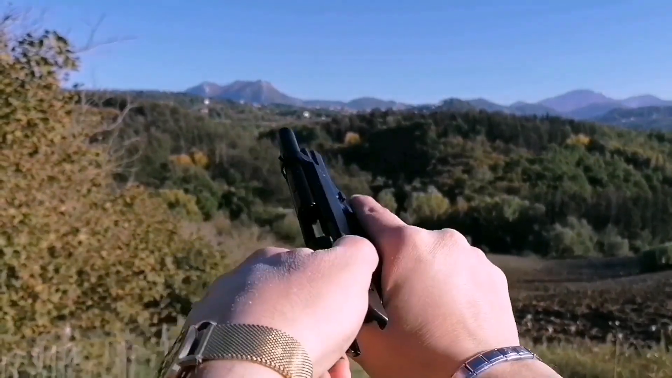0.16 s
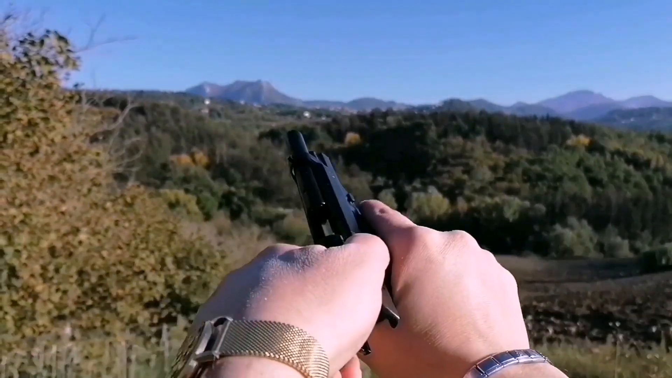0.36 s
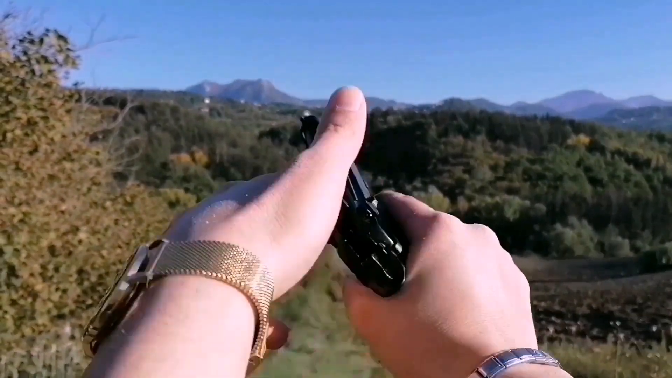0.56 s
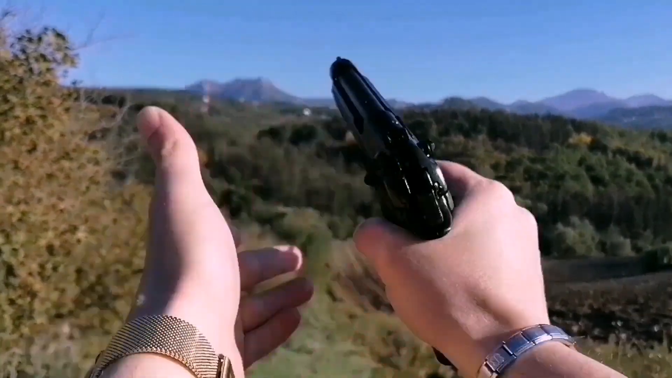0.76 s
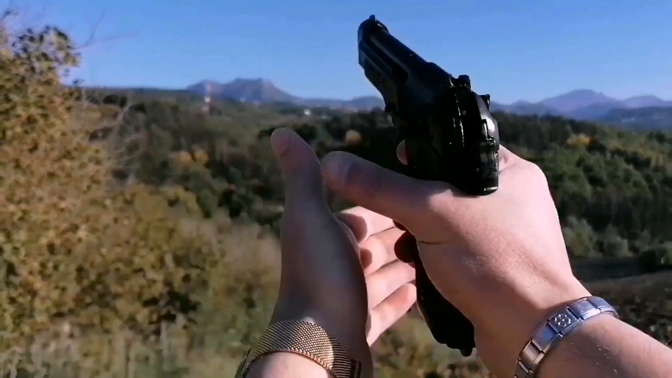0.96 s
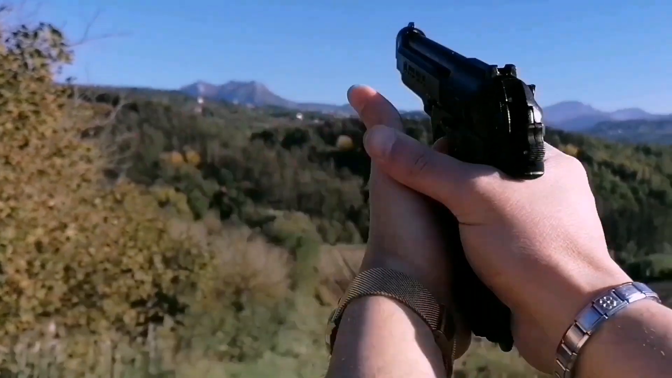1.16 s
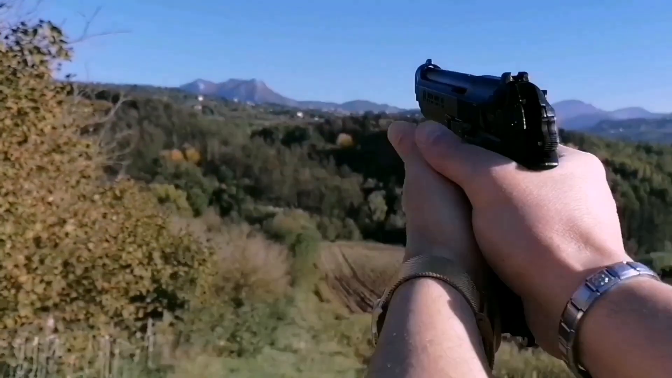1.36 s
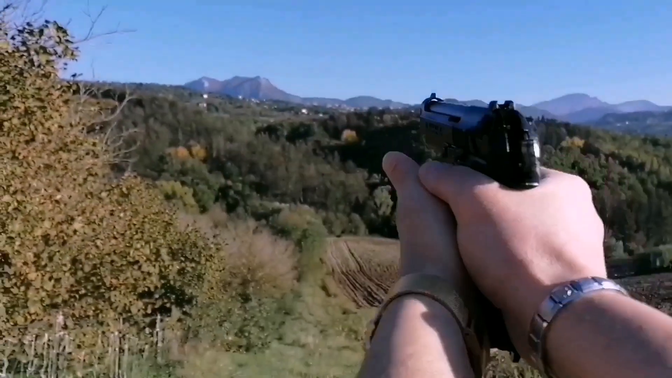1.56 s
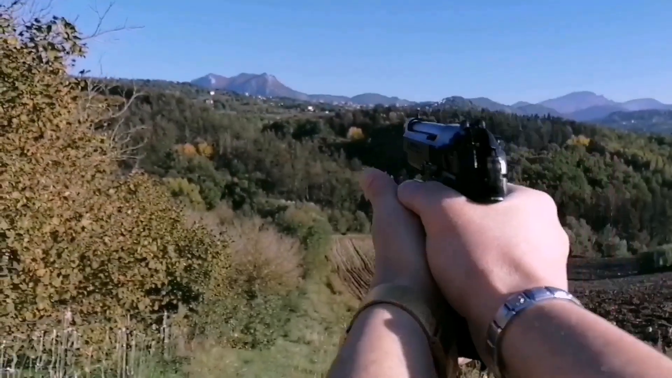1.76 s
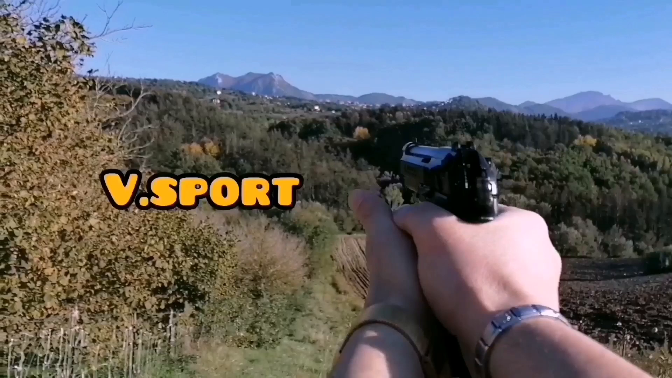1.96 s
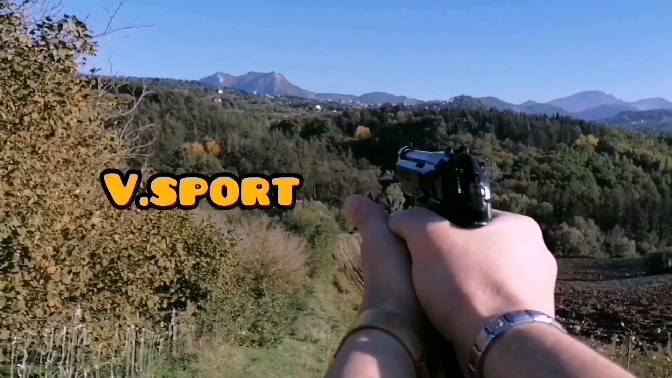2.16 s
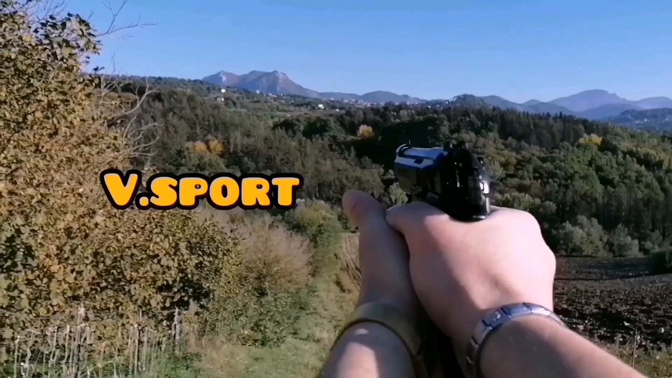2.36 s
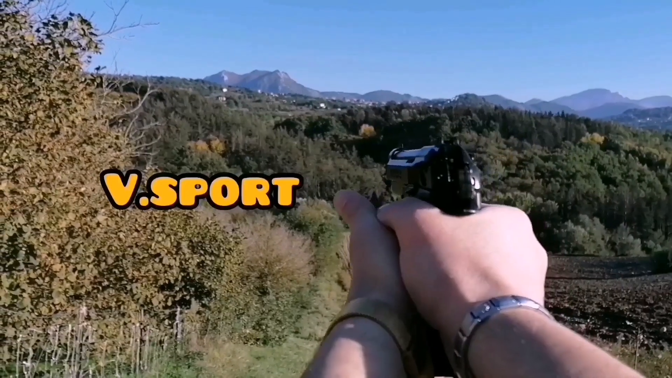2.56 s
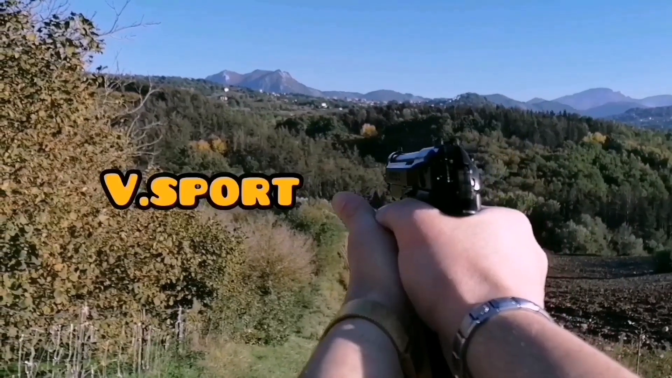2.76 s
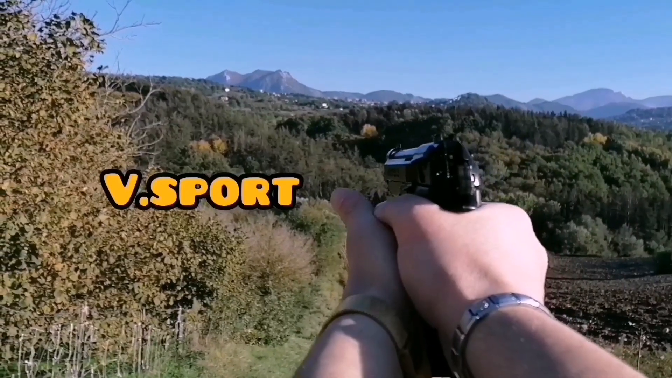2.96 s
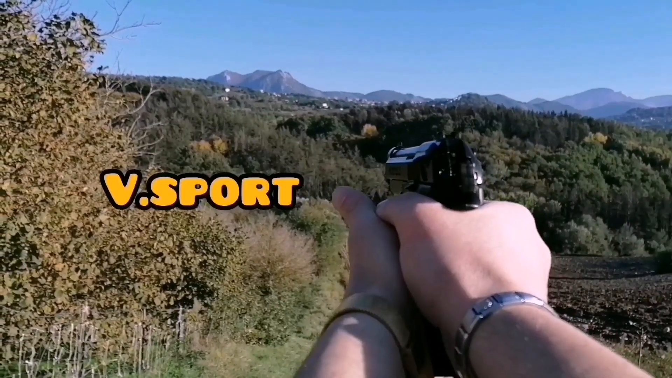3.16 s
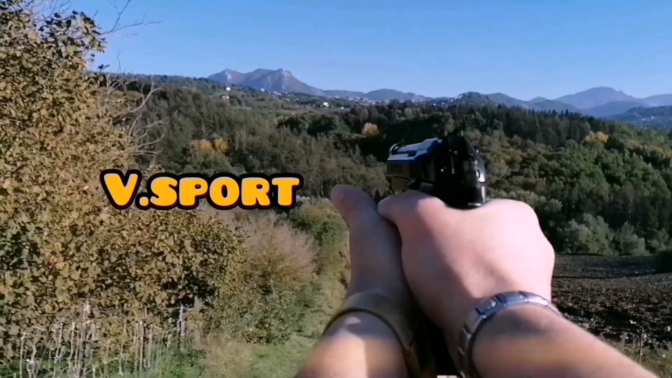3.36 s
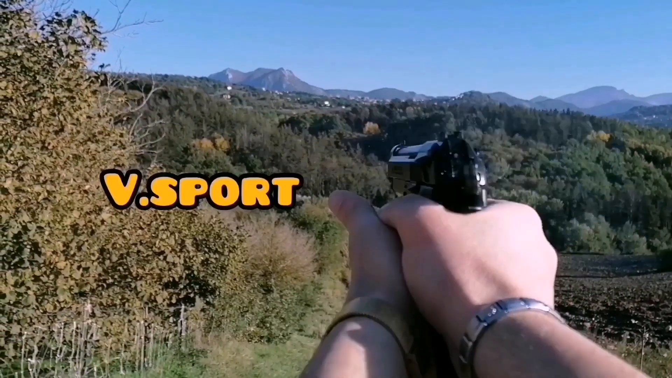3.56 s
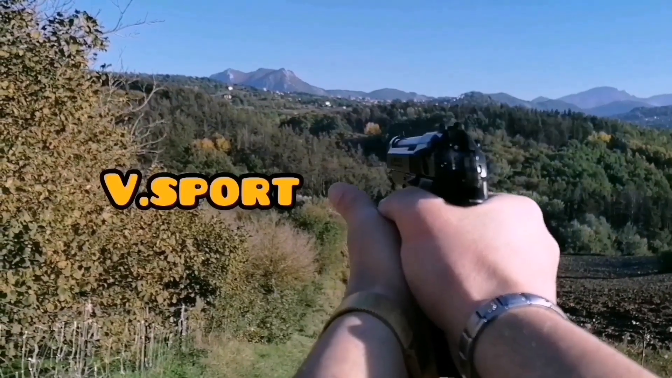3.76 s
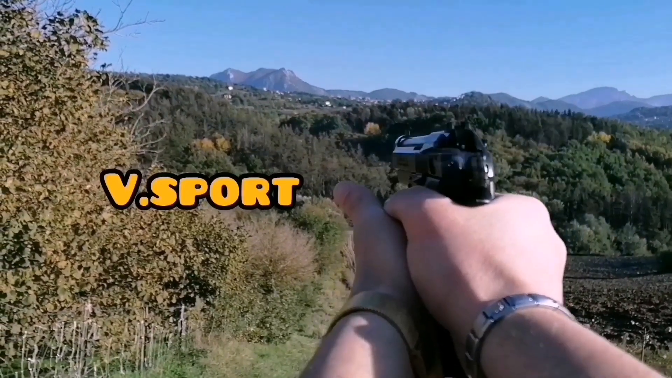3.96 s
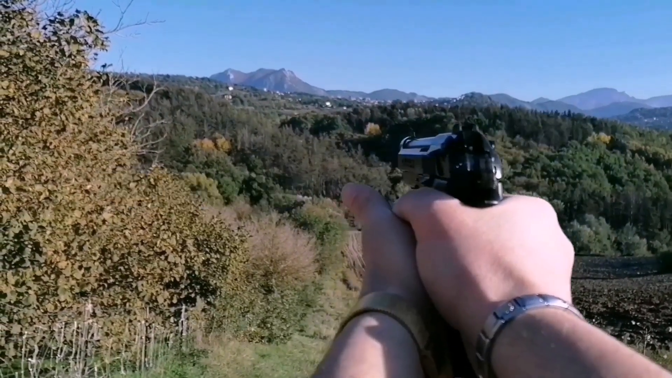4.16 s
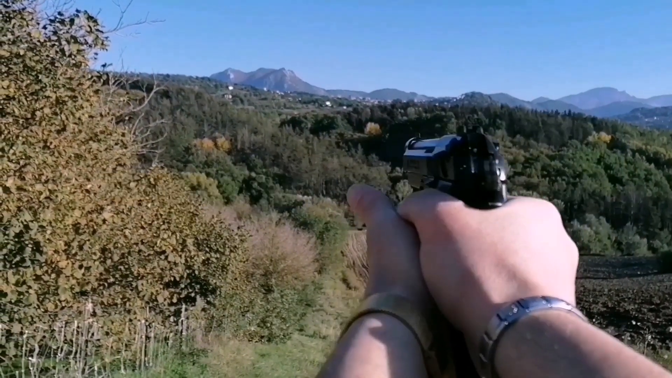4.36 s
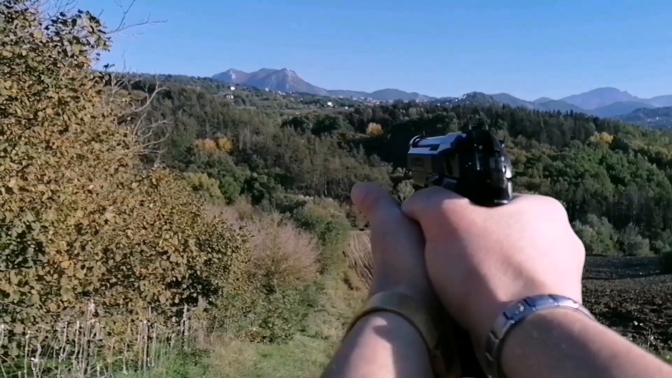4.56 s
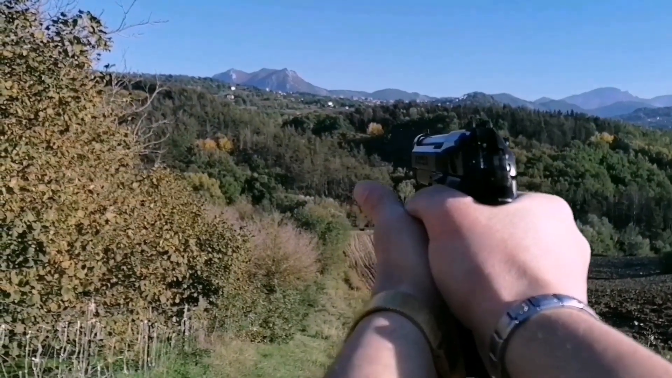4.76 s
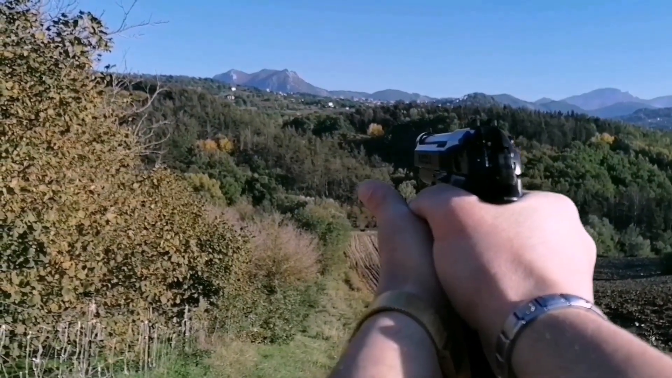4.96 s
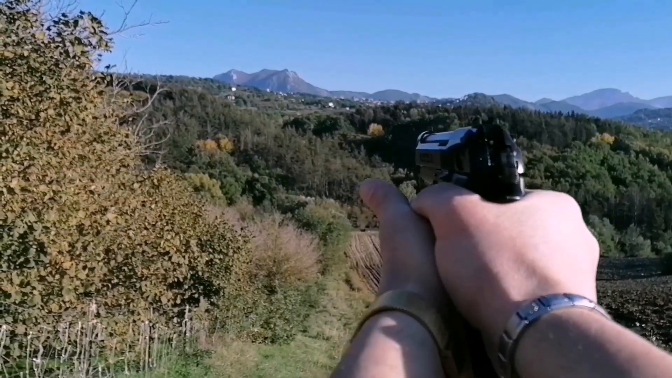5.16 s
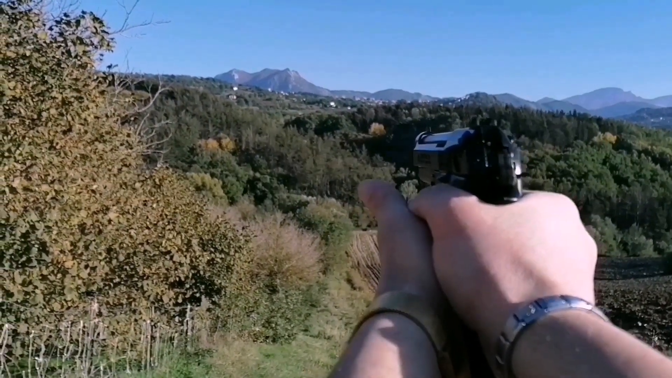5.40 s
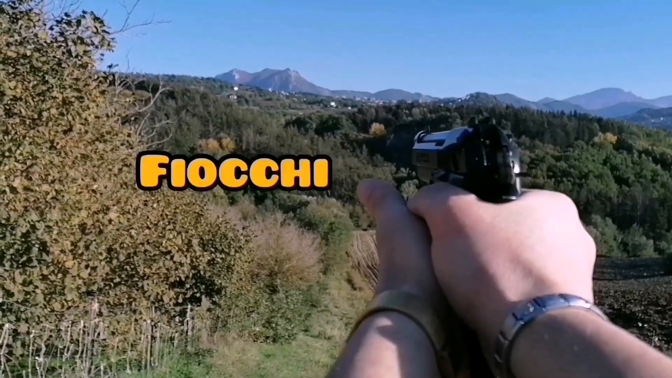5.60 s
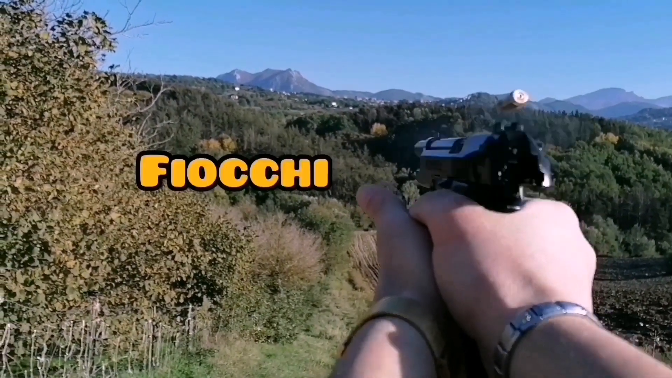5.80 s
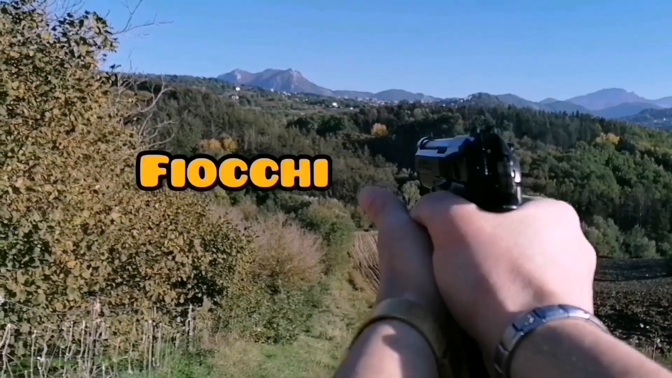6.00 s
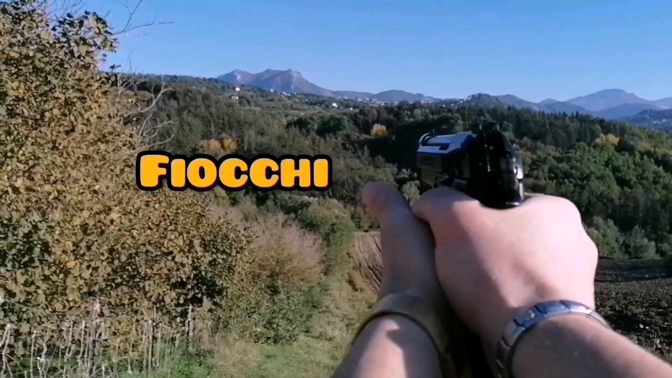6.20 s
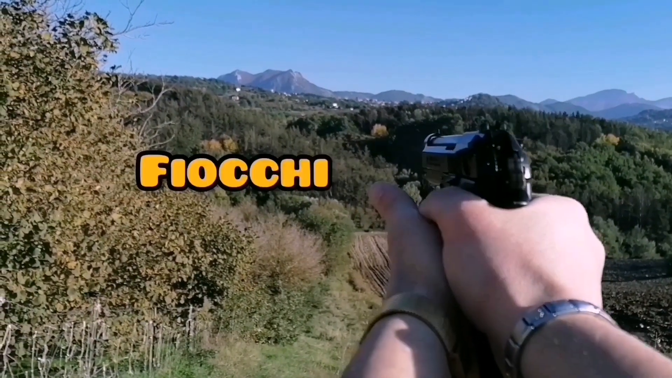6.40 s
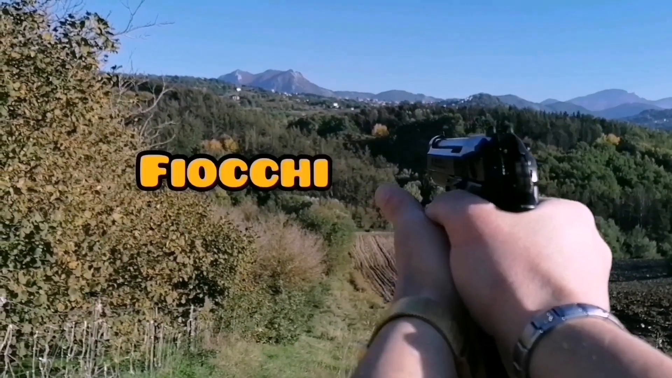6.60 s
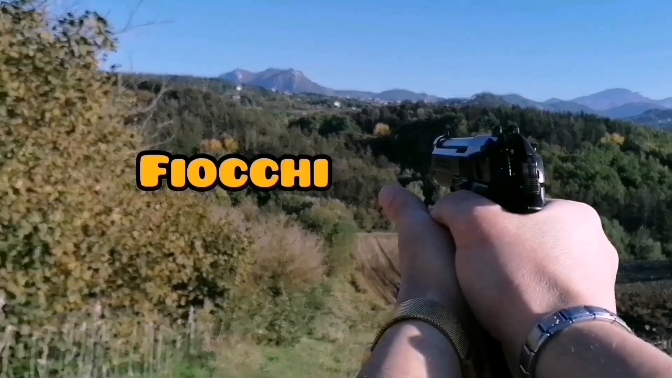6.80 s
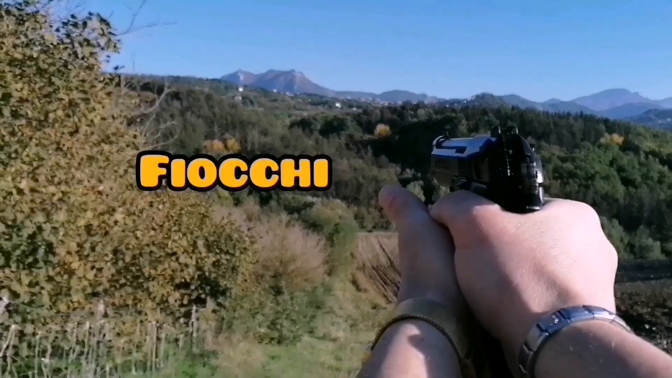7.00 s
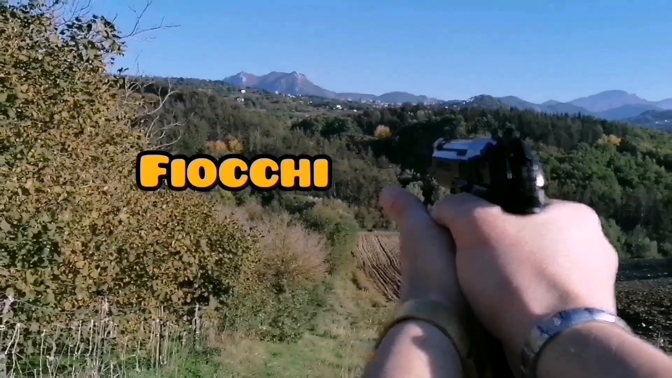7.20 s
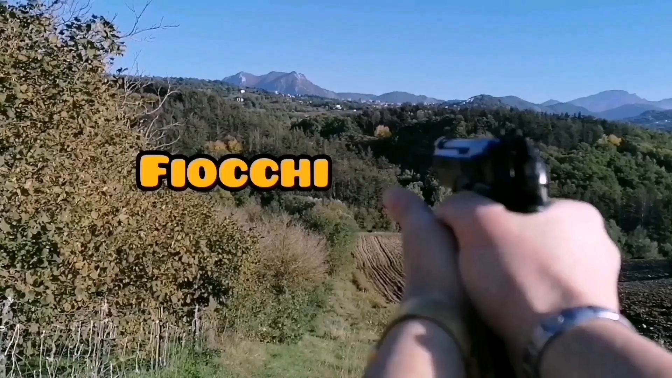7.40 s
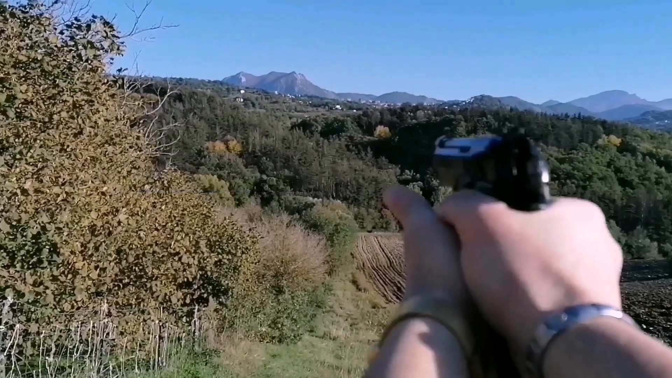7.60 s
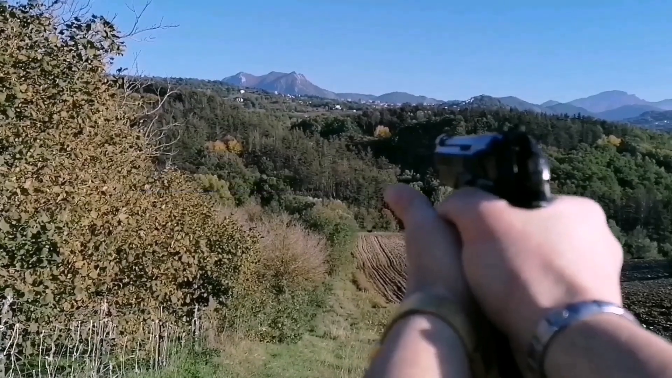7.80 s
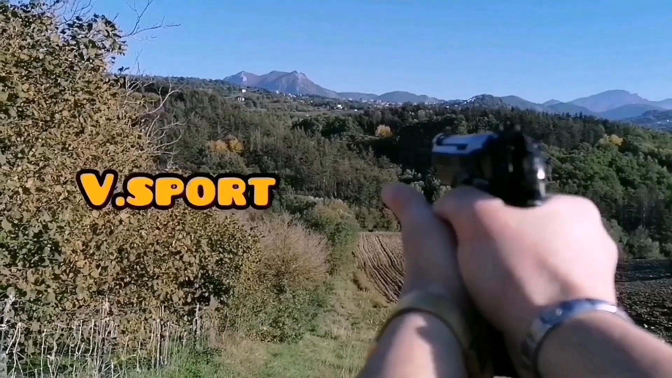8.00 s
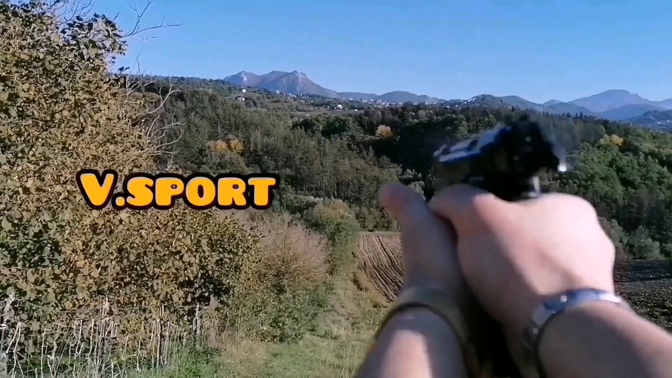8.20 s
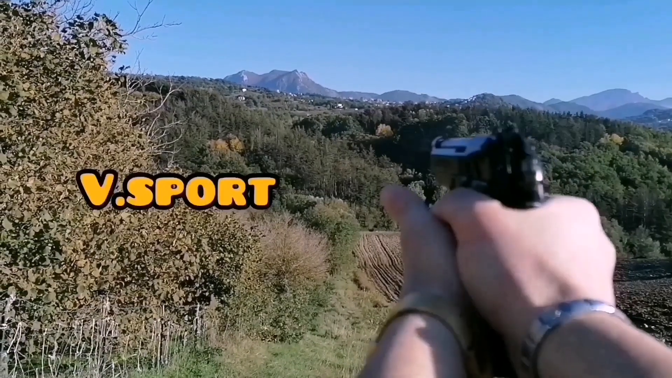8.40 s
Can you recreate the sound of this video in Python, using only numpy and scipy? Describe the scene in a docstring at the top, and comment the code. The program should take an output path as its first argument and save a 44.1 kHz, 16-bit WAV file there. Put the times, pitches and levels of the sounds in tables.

```python
"""Blank pistol on an open hillside

The slide is drawn back and let go, its steel ringing at each impact; then three shots overload the
microphones. Each blast, a sudden puff of gas, echoes from the same slopes and woods and returns late
from across the valley. Cases drop in the grass and hands shift on the grip, while a far bird and a
far engine sound over rustling leaves and a low country rumble."""
import sys
import numpy as np
from scipy import signal
from scipy.io import wavfile

SR = 44100
rng = np.random.default_rng(int(sys.argv[2]) if len(sys.argv) > 2 else 0)


def to_wav(s):
    """Save 16-bit WAV."""
    ch = np.atleast_2d(s).T  # columns
    pcm = np.round(np.clip(ch, -1, 1) * 32767)  # PCM
    wavfile.write(sys.argv[1], SR, pcm.astype(np.int16))


N = 372644

# Diffuse sound at two microphones. Each row: frequency in Hz, left-right correlation.
COHERENCE = [(60, 0.8), (180, 0.51), (550, 0.56), (1650, -0.44), (4970, 0.012), (15000, -0.03)]
# Spectra of rustle, rumble and echoes. Each row: frequency in Hz, relative spectral density in dB.
RUSTLE_SPECTRUM = [(88, -29), (150, -6.5), (339, -5), (860, -11.5), (1000, -10.5), (1420, -11), (5760, -23),
                   (14100, -35), (15500, -41.5)]
RUMBLE_SPECTRUM = [(12, -32), (20, 2), (54, 2), (86, 2.5), (108, -12.5), (134, -5), (189, -21), (300, -26),
                   (390, -46), (660, -120)]
ECHO_SPECTRUM = [(41, -46.5), (70, -12.5), (150, -9), (300, -2.5), (500, 0.5), (1000, 2), (1700, -5),
                 (2600, -10.5), (3300, -19), (6100, -24), (15000, -59)]
# Swells of the rumble. Each row: time in seconds, level in dB.
RUMBLE_LEVEL = [(0, -60), (.3, -48), (.5, -45.5), (.6, -49), (.68, -49), (.8, -39.5), (.95, -46.5),
                (1.08, -41.5), (1.25, -49.5), (2.8, -51), (3.1, -48.5), (3.5, -52)]
# An engine changing gear down the valley. Each row: time in seconds, firing rate in Hz.
FIRING_RATE = [(0, 85.2), (2.9, 83.3), (2.95, 74), (3.35, 90.6), (4.3, 103.4), (4.9, 99), (5.7, 110),
               (6.6, 80.4), (7.65, 109.8), (7.7, 75.4), (8.45, 89.2)]
# Its harmonics. Each row: multiple of the firing rate, relative level in dB.
ENGINE_ORDERS = [(1, -4), (2, 0.5), (3, -9)]
# Bird calls. Each row: start and length in seconds, first and held pitch in Hz, level in dB.
WHISTLES = [(2.826, .025, 4900, 3920, -63), (2.868, 0.21, 3600, 4360, -54.5), (2.982, .03, 4300, 3520, -66),
            (4.548, 0.34, 4300, 4240, -61.5)]
# Knuckles and watch strap knock, palms rub, trigger and falling cases click.
# Each row: start in seconds, peak level in dB, nominal frequency in Hz, left minus right in dB.
KNOCKS = [(.7498, -40.5, 1193, 0), (.798, -31.5, 816, 1), (.984, -33, 700, 1), (1.2222, -40, 1300, 3),
          (1.399, -40.5, 700, 1), (1.454, -39, 2500, 1), (1.476, -37.5, 1500, 14)]
RUBS = [(1.4333, -42, 1780, 10), (1.49, -43, 1400, 9), (1.7194, -49, 1500, 3), (1.75, -42, 400, -2)]
CLICKS = [(2.0551, -34, 3774, 5), (4.1649, -33.5, 7014, 3), (4.42, -46, 5020, 5), (4.4464, -40.5, 3500, -7),
          (4.5247, -39, 4450, 3), (4.632, -40, 4000, 0), (4.742, -33.5, 1690, -10),
          (6.5283, -20.5, 5600, 8.5), (6.6899, -45, 7995, 2), (6.9052, -50, 5970, 8),
          (7.4205, -37.5, 2026, -2)]
# Modes of the pistol's steel. Each row: frequency in Hz, level in dB, free T60 in seconds, rattle 0-1.
STEEL_MODES = [(950, -6, .03, 1), (1220, -6, .08, .25), (2100, -5, .025, 1), (3250, -3, .04, 1),
               (3600, -9, .08, .6), (3820, -24, .45, .7), (2900, -27, .35, .8), (4800, -25, .4, .7),
               (5500, -25, .4, .7), (4045, -4, .08, .3), (4450, -5, .05, 1), (5280, -3, .05, .6),
               (6342, -22, .3, .4), (6900, -6, .03, 1), (7800, -5, .03, 1), (8100, -26, .2, .3),
               (8720, -27, .3, .3), (9733, -20, .25, .2), (10520, -8, .03, 1), (11950, -51, 1.2, .3),
               (12800, -14, .03, 1), (15000, -16, .03, 1), (5965, -27, 1.8, .04), (5973.5, -33, 1.4, .08)]
# The slide on its rails. Each row: start and stop in seconds, level in dB.
STROKES = [(0.033, 0.078, -17), (0.447, .52, -27.5)]
# Impacts as the slide is worked, lands home and its loose parts settle.
# Each row: time in seconds, relative level in dB, favoured frequency in Hz.
RACK = [(0.028, -22.5, 5315), (.033, -19, 3600), (.036, -3.5, 2100), (0.037, -29.5, 2100),
        (.042, -15.5, 6900), (.047, 4, 951.4), (.053, -13.5, 954), (0.0707, 2, 4045), (0.081, -18.5, 3600),
        (0.1016, -36, 1228), (.474, -23, 4495), (0.4821, -14, 2100), (.485, 2, 10520), (0.49, 0.5, 5290),
        (0.4966, 4, 5280), (0.503, 5, 3600), (0.5074, 0.5, 9733)]
HOME = (.5084, 0.56, 5700)
BOUNCES = [(0.509, -11.5, 3250), (0.524, -20.5, 3250)]
# The action in a shot: sear, hammer, slide back, round stripped, chambering, slide home. Each row: delay
# in seconds, relative level in dB, tilt in dB per octave, damping in dB per second, favoured mode in Hz.
CYCLE = [(-.0065, -28, 0, 500, 2100), (-.004, -9, 0, 1500, 3600), (.014, 2, 1, 800, 9733),
         (.032, 0, 0, 600, 5280), (.043, 5, -1, 200, 4045), (.047, -7, 0, 20, 5965)]
# Near banks, hillside, woods, tree line, far slope, hills behind. Each row: distance and depth in metres,
# relative level in dB, fade in dB per second, treble and bass in dB per octave, left minus right in dB.
ECHO_ZONES = [(4.97, 5.9, -15, 107.5, 7, -2.5, 4), (30, 35.5, -24, 101, 3, 1.5, 3.5),
              (60, 31.6, -33, 14.5, -5.5, 1, 6), (120.5, 25.4, -45, 200, 7.5, 9.5, 0.5),
              (276.5, 33, -35, 48, -4.5, -14.5, 2.5), (320, 30, -40.5, 4, -14, 3.5, 4)]
# Reflections from single hard faces. Each row: delay in seconds, level in dB, frequency in Hz.
SLAPS = [(.088, 0, 880), (.144, -8, 857), (.179, -11, 934), (0.2438, -15, 1080), (0.2547, 0.5, 1107),
         (.274, -30, 750), (.284, -9.5, 800), (.409, -15.5, 580), (.433, -5, 1070)]
# Sound near the muzzle. Each row: frequency in Hz, relative density of the ground reflection in dB,
# its T60 in seconds, relative density of the gas puff in dB.
BLAST_SPECTRUM = [(59.7, -17, 0.64, -5), (150, 2, 0.33, 11.5), (300, 5.5, 0.25, 14.5),
                  (700, -5.5, 0.25, 22), (1500, -3, 0.16, 1), (4000, -8.5, 0.29, -2.5),
                  (9400, -18.5, 0.39, -6.5), (15100, -23.5, 0.17, -23.5)]
# The shots. Each row: time in seconds, charge gain in dB, slide travel time factor, action gain in dB.
SHOTS = [(3.3833, 0, 0.93, -2.5), (5.7754, -1.5, 1.1, -2.6), (8.1643, -2, 1.0, -5.5)]

BAND_CENTRES_HZ = 28 * 2 ** np.arange(0, 9.3, .4)
SOUND_M_PER_S = 343


def amp(db):
    """Amplitude ratio for a level in dB."""
    return 10 ** (np.asarray(db) / 20)


def unit_rms(x):
    """Normalisation to unit mean power."""
    return x / np.sqrt(np.mean(x ** 2) + 1e-20)


def at_hz(rows, hz, column=1):
    """Interpolation of a table column along a logarithmic frequency axis."""
    rows = np.array(rows)
    return np.interp(np.log(hz), np.log(rows[:, 0]), rows[:, column])


def add(out, sound, start_s):
    """Superposition of a sound on a stereo mix."""
    i = round(start_s * SR)
    out[:, i:i + sound.shape[-1]] += sound[..., :N - i]


def pan(db):
    """Left and right gains: a level difference gives direction."""
    return amp(np.array([db, -db]).reshape(2, -1) / 2)


def flicker(size, rate):
    """Random modulation: Gaussian points, `rate` a second, joined by straight lines."""
    points = rng.standard_normal(int(size * rate // SR + 2))
    return np.interp(np.arange(size) * rate / SR, np.arange(len(points)), points)


def bandpass(x, low_hz, high_hz):
    """Butterworth filtering to one band."""
    return signal.sosfilt(signal.butter(2, [low_hz, high_hz], "band", fs=SR, output="sos"), x)


def noise_bands(size, extra_coherence=0):
    """A diffuse field: yields each centre frequency with its band of partly coherent stereo noise."""
    white = rng.standard_normal((2, 2, size + 4000))
    for k, hz in enumerate(BAND_CENTRES_HZ):
        mid, side = bandpass(white[k % 2], hz * 2 ** -.2, min(hz * 2 ** .2, .45 * SR))[:, 4000:]
        coherence = np.clip(at_hz(COHERENCE, hz) + extra_coherence, -1, 1)
        yield hz, np.sqrt(1 + coherence) * mid + np.sqrt(1 - coherence) * side * [[1], [-1]]


def rustle_and_rumble():
    """Modulated broadband noise: leaves and clothing rustle over an uneven far rumble."""
    t = np.arange(N) / SR
    sleeves_db = 5 * np.exp(-((t - 1.0) / 0.28) ** 2)   # the arms come up
    rustle, rumble, gust_db = 0, 0, flicker(N, 5.3)
    for hz, band in noise_bands(N):
        rustle += band * amp(at_hz(RUSTLE_SPECTRUM, hz) + gust_db + flicker(N, 11))
        if hz < 320:
            rumble += band * amp(at_hz(RUMBLE_SPECTRUM, hz) + 2 * flicker(N, 11))
    rumble_db = np.interp(t, *np.transpose(RUMBLE_LEVEL))
    return amp(-54.5 + sleeves_db) * unit_rms(rustle) + amp(rumble_db) * unit_rms(rumble)


def engine():
    """Periodic firing gives a harmonic series, which wavers on the air and grows as it draws near."""
    t = np.arange(N) / SR
    firing_hz = np.interp(t, *np.transpose(FIRING_RATE)) * (1 + 0.009 * flicker(N, 24))
    phase = 2 * np.pi * np.cumsum(firing_hz) / SR
    approach_db = -58 - 2.5 * np.maximum(7.5 - t, 0)
    harmonics = sum(amp(db + flicker(N, 8.2)) * np.sin(k * phase) for k, db in ENGINE_ORDERS)
    return np.sqrt(2) * amp(approach_db) * harmonics


def bird(glide_s=.015, fade_db_per_s=55):
    """Frequency-modulated tones: each thin, unsteady whistle glides to a held pitch and fades."""
    out = np.zeros((2, N))
    for start, length, first_hz, held_hz, db in WHISTLES:
        t = np.arange(0, length, 1 / SR)
        hz = held_hz + (first_hz - held_hz) * np.exp(-t / glide_s) + 60 * flicker(len(t), 297)
        tone = np.sqrt(2) * np.sin(2 * np.pi * np.cumsum(hz) / SR)
        taper = np.sin(np.pi * t / length) ** 0.6
        add(out, tone * taper * amp(db - fade_db_per_s * t + 3.5 * flicker(len(t), 76)), start)
    return out


def contacts(rows, t60_s):
    """Light, heavily damped contacts radiate decaying bursts of band-limited noise."""
    out, t = np.zeros((2, N)), np.arange(6000) / SR
    for start, db, hz, side_db in rows:
        noise = rng.standard_normal(len(t)) * amp(-60 * t / t60_s)
        burst = bandpass(noise, hz / 2, min(hz * 1.53, 15000))
        add(out, amp(db) * burst / np.abs(burst).max() * pan(side_db), start)
    return out


def steel_impact(db, tilt, damping, favoured_hz):
    """Modal vibration: a blow cracks and excites the steel's damped modes with random strengths."""
    hz, mode_db, t60, rattle = np.transpose(STEEL_MODES)[:, :, None]
    t = np.arange(round(SR * np.clip(150 / (damping + 1), .45, 1.2))) / SR
    spot_db = 10 * np.exp(-(np.log2(hz / favoured_hz) / 0.1) ** 2)   # the place struck favours a few modes
    chance_db = rng.normal(0, 1 + 3 * rattle, (len(hz), 2))
    strength = amp(mode_db + spot_db + tilt * np.log2(hz / 4000) + chance_db)
    chatter = 1 - rattle + rattle * np.array([flicker(len(t), 1200) for _ in hz])
    held_and_free = amp(-t * damping) + amp(-21) * (rattle > .1)   # untouched loose parts ring on
    modes = np.sin(2 * np.pi * hz * t) * amp(-60 * t / t60) * held_and_free * chatter
    noise = bandpass(rng.standard_normal((2, 2, len(t))), 1300, 10000)
    crack = noise[0] * amp(4 - t * (60 / 0.072 + damping))
    scatter = noise[1] * amp(-25.5 - 60 * t / 0.25)   # from hands, body and ground
    blow = strength.T @ modes * np.minimum(t / 0.00022, 1) + crack + scatter
    radiation = signal.butter(3, 800, "high", fs=SR, output="sos")   # too small to radiate bass
    return amp(db - 8) * signal.sosfilt(radiation, blow)


def rail_friction(rise_db_per_s=599, fall_db_per_s=899.5):
    """Sliding friction makes gritty noise that swells and dies with each stroke."""
    t = np.arange(round(.6 * SR)) / SR
    envelope = amp(-31.5) * (t < STROKES[0][0])   # the hand is already drawing
    for start, stop, db in STROKES:
        to_peak_s, past_stop_s = np.maximum(start + 0.047 - t, 0), np.maximum(t - stop, 0)
        envelope += amp(db - rise_db_per_s * to_peak_s - fall_db_per_s * past_stop_s)
    grit = rng.standard_normal((2, len(t))) * envelope * amp(4 * flicker(len(t), 400))
    return bandpass(grit, 900, 6000)


def slide(release_s=.3, grip_closes_s=0.77):
    """Contact damping: the hand and each next blow cut the ring short; landing home, it rings free."""
    out = np.zeros((2, N))
    add(out, rail_friction(), 0)
    gaps_s = np.diff([row[0] for row in RACK + [HOME]])
    damping_db_per_s = list(400 + 8.5 / np.maximum(gaps_s, .003)) + [0] + [660] * len(BOUNCES)
    for (start, db, hz), damping in zip(RACK + [HOME] + BOUNCES, damping_db_per_s):
        tilt = 0.98 + 0.3147 * db - 1.5 * (start < release_s)   # brighter if harder, duller while held
        add(out, steel_impact(db, tilt, damping, hz), start)
    gripped_s = np.maximum(np.arange(N) / SR - grip_closes_s, 0)
    return out * amp(-53 * gripped_s)   # the second hand stills the ring


def landscape_echoes(onset_share=.12, air_db_per_s_at_4khz=6):
    """Reflection: each zone answers after its round trip, and air absorption dulls the late returns."""
    t = np.arange(round(3.1 * SR)) / SR
    near_m, depth_m, level_db, fade, treble, bass, side_db = np.transpose(ECHO_ZONES)[:, :, None]
    first_s, last_s = 2 * near_m / SOUND_M_PER_S, 2 * (near_m + depth_m) / SOUND_M_PER_S
    swell = np.clip(1 + (t - first_s) / (onset_share * first_s + 0.016), 0, 1) ** 2
    power = (swell * amp(level_db - fade * np.maximum(t - last_s, 0))) ** 2
    clumps_db = (1.14 + 1.7 * np.exp(-t / .5)) * flicker(len(t), 150)   # near echoes clump, far ones blend
    out, midrange = 0, 0
    for hz, band in noise_bands(len(t), extra_coherence=.15):
        coloured = band * amp(at_hz(ECHO_SPECTRUM, hz))
        midrange += coloured * (300 < hz < 1500)
        slope_db = treble * np.log2(max(hz / 1100, 1)) + bass * np.log2(max(300 / hz, 1))
        envelope = np.sqrt((pan(side_db) * amp(slope_db).T) ** 2 @ power)   # zones add in power
        air_loss_db = air_db_per_s_at_4khz * t * (hz / 4000) ** 2
        out += coloured * envelope * amp(clumps_db + 1.6 * flicker(len(t), 25) - air_loss_db)
    out /= np.std(midrange)
    slap_t = t[:440]
    pulse = np.exp(-((slap_t - .005) / 0.0012) ** 2)
    for delay_s, db, hz in SLAPS:
        add(out, amp(db) * np.sin(2 * np.pi * hz * slap_t) * pulse * pan(4), delay_s - .005)
    out[1] = np.roll(out[1], 16)   # most echoes come from the left and reach the right late
    return out


def muzzle_blast():
    """Sudden expansion: a puff of gas and its ground reflection, whose bands decay at their own rates."""
    t = np.arange(SR // 2) / SR
    out, puff_t60 = 0, .06
    for hz, band in noise_bands(len(t), extra_coherence=0.067):
        ground_db, ground_t60, puff_db = (at_hz(BLAST_SPECTRUM, hz, column) for column in (1, 2, 3))
        out += band * (amp(ground_db - 60 * t / ground_t60) + amp(puff_db - 60 * t / puff_t60))
    return amp(14) * (1 - np.exp(-t / 0.0001)) * out


def shots():
    """Time invariance: the land answers every shot alike, while blast and action vary in part."""
    out, echoes, shared_blast = np.zeros((2, N)), landscape_echoes(), muzzle_blast()
    for start, charge_db, travel, action_db in SHOTS:
        add(out, amp(charge_db) * echoes, start)
        add(out, amp(charge_db) * (0.49 * shared_blast + 0.5 * muzzle_blast()), start)
        for delay_s, *blow in CYCLE:
            add(out, amp(action_db) * steel_impact(*blow), start + delay_s * travel)
    return out


def scene():
    """Linear superposition: the pressures of all sources add."""
    small = contacts(KNOCKS, t60_s=0.032) + contacts(RUBS, t60_s=0.16) + contacts(CLICKS, t60_s=0.013)
    return slide() + shots() + small + bird() + engine() + rustle_and_rumble()


def record(dry, coupling_hz=2.4, cutoff_hz=15700):
    """Asymmetric overload: slam and shots shift the resting point; peaks clip and the top is cut."""
    t = np.arange(N) / SR
    pulses = [(HOME[0] + .0016, -.33, .004)]
    for start, *_ in SHOTS:
        pulses += [(start + .0105, .27, .005), (start + .033, -.09, .01)]
    shift = sum(size * np.exp(-((t - at_s) / width_s) ** 2 / 2) for at_s, size, width_s in pulses)
    shift = signal.lfilter(*signal.butter(2, coupling_hz, "high", fs=SR), shift)   # slow recovery
    clipped = np.clip(dry + shift * pan(5), -.97, .97)   # the left shifts more
    lowpass = signal.cheby2(12, 40, cutoff_hz * 1.03, fs=SR, output="sos")
    return np.clip(signal.sosfilt(lowpass, clipped), -1, 1)


dry = scene()
out = record(dry)
to_wav(out)
```